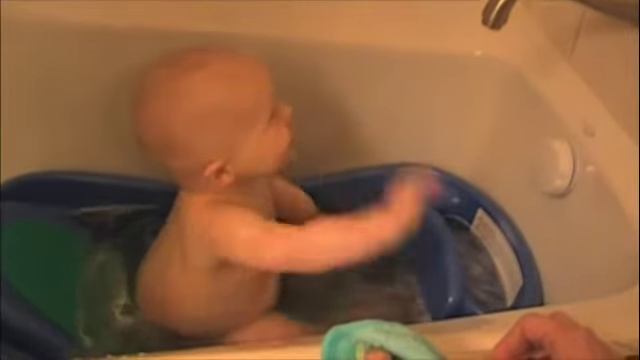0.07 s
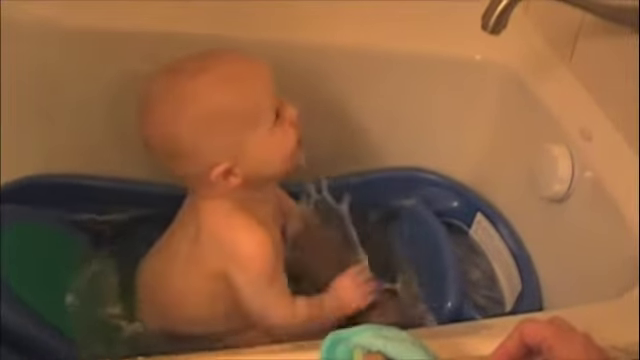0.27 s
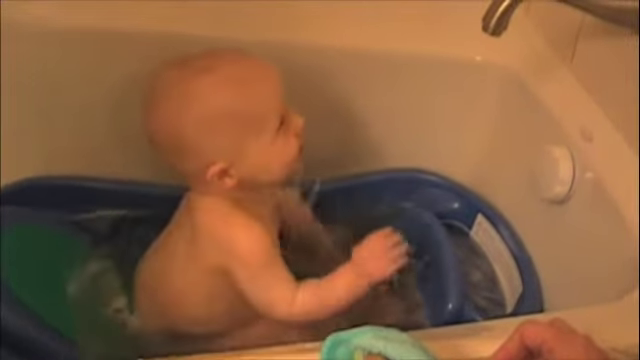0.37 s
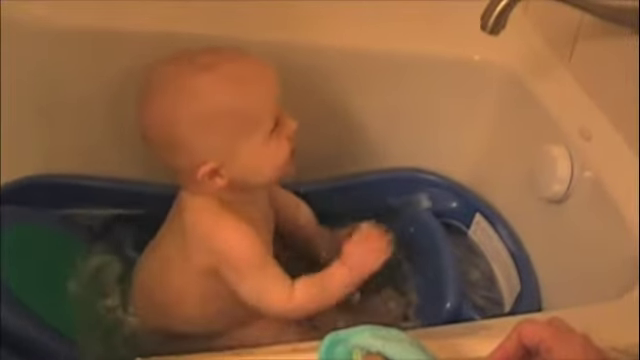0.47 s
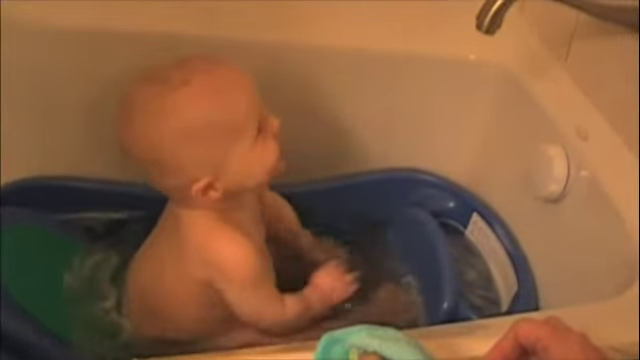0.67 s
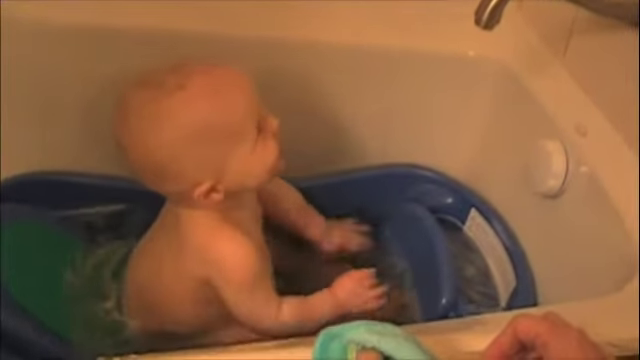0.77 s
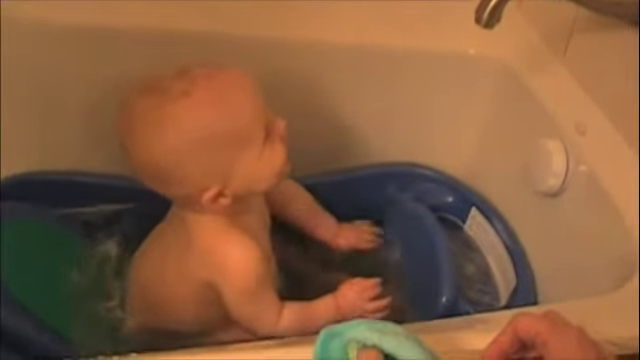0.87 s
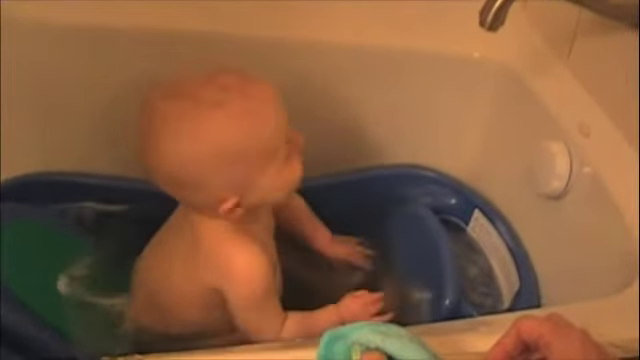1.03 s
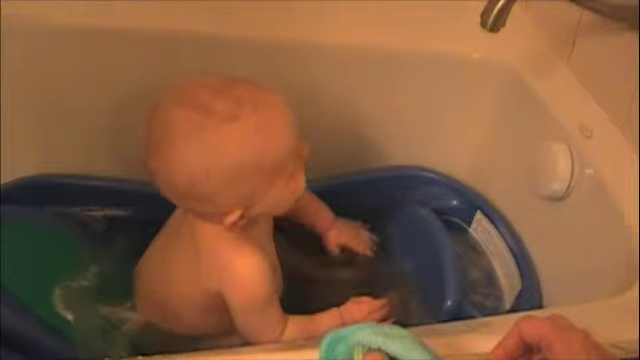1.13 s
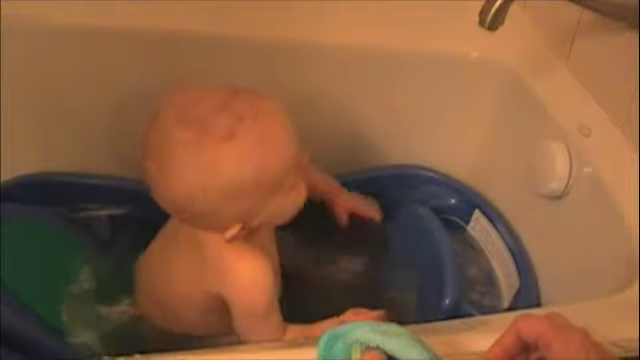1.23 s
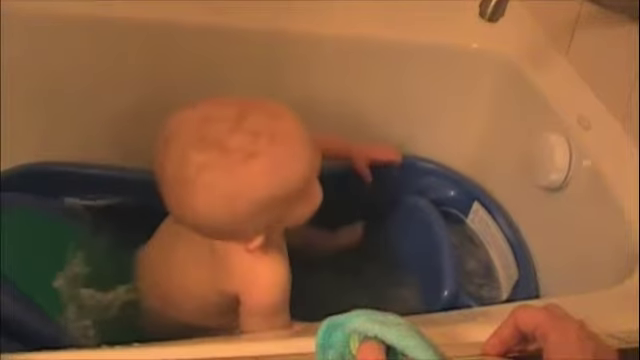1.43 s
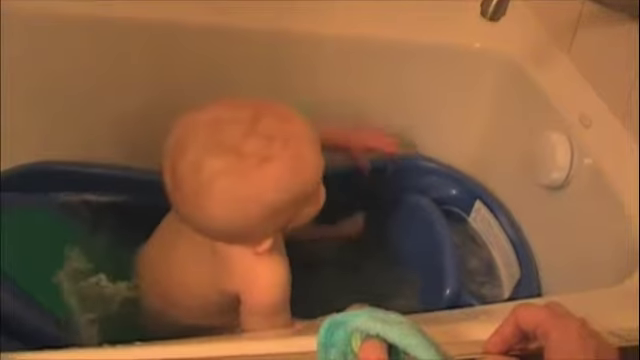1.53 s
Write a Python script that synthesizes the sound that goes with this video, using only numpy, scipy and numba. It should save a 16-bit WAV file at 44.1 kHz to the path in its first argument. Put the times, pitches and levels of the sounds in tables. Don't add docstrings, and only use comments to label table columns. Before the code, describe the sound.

A small hand slaps bath water twice, throwing bright, crackling spray; bubbles gurgle and drops fall back, then fade to light drips. A plastic seat knocks dully. Close, hard bathroom echo, thin camera microphone.

```python
import sys
import numpy as np
from scipy import signal
from scipy.fft import rfft, irfft
from scipy.io import wavfile
from scipy.ndimage import map_coordinates
from numba import njit

SR = 44100
rng = np.random.default_rng(int(sys.argv[2]) if len(sys.argv) > 2 else 0)


def attenuation_scalar(level_db):
    decades = np.asarray(level_db, float) / 20
    return 10 ** decades


def generate_wav(signal):
    frames = np.transpose(np.atleast_2d(signal))
    scaled = np.clip(frames, -1, 1) * 32767
    pcm = np.round(scaled).astype(np.int16)
    wavfile.write(sys.argv[1], SR, pcm)


N = 70560

# frequency in Hz, level in dB per Hz.
HUSH_SPECTRUM = [(15, -47), (25, -5), (87, 10), (1440, -5), (2160, -58), (3820, -22), (7510, -14),
                 (14400, -29), (16000, -45)]
# time in seconds, level in dB.
SEAT_RUB = [(0.0, -45), (0.16, -46.5), (0.236, -43), (0.444, -58), (0.48, -81), (0.531, -37), (0.65, -57),
            (0.988, -61), (1.6, -57.5)]
# frequency in Hz, time to fall 60 dB in seconds.
ROOM_DECAY = [(200, 0.54), (1500, 0.42), (5000, 0.54), (12000, 0.31)]
# frequency in Hz, side minus mid in dB.
SIDE_SPECTRUM = [(60, -10), (250, -14), (1000, -16.5), (3000, -18), (6300, -23), (8300, -6), (10800, -10),
                 (15000, -7)]
# frequency in Hz, left minus right in dB.
LEFT_RIGHT = [(100, -3.7), (300, -3.5), (1000, -1.2), (8000, 0), (13000, 1.2)]
# start in seconds, level in dB, pitch in Hz, length in cycles.
SEAT_KNOCKS = [
    (0.028, -25, 260, 3),
    (0.202, -19, 244, 1.4),
    (0.239, -25, 202, 2.1),
    (0.515, -20.5, 830, 11),
    (0.525, -21.5, 402, 4.8),
    (0.54, -24.5, 596, 6),
    (1.225, -33, 255, 2.9),
    (1.289, -40.5, 640, 5),
    (1.352, -36, 296, 3),
    (1.525, -37, 304, 2.1),
]
# time in seconds, level in dB, brightness in dB per octave.
WATER_CHURN = [(0.0, -58.5, -9), (0.11, -54.5, -6.5), (0.208, -53, -8.5), (0.237, -30, -1),
               (0.286, -33, -4.5), (0.392, -37.5, -0.5), (0.686, -30.5, 0), (0.836, -41.5, -2),
               (1.078, -58.5, 5.5), (1.32, -61.5, -7), (1.6, -54.5, -5)]
# frequency in Hz, level in dB.
SPRAY_SPECTRUM = [(250, -8.5), (500, -7), (700, -2), (1150, -1.5), (1500, 4), (4500, -2), (8000, -8),
                  (15000, -42.5)]
# peak in seconds, level in dB, rise in seconds, fall in seconds,
# brightness in dB per octave.
SPRAY_GUSHES = [
    (0.218, -35, 0.00044, 0.013, 15),
    (0.227, -21.5, 0.0016, 0.0046, -1),
    (.43, -43, 0.0024, 0.016, 10),
    (0.506, -19.5, 0.0018, 0.022, -3),
    (0.575, -16.5, 0.0053, 0.0028, 6),
    (0.723, -39, 0.0037, 0.0043, 2.5),
    (1.233, -53, 0.036, 0.027, -7.5),
    (1.528, -32, 0.0028, 0.0085, -1.5),
]
# start in seconds, level in dB, pitch in Hz, length in cycles.
SPRAY_CRACKS = [
    (.2275, -17, 6900, 9),
    (.5712, -15, 7700, 14),
    (.5738, -15, 6700, 12),
    (.5755, -16, 8200, 12),
    (.5776, -7.5, 7200, 10),
    (.5797, -18, 7700, 14),
    (.7262, -20, 6700, 14),
    (1.0205, -30, 8000, 6),
    (1.022, -33, 10500, 8),
]
# start in seconds, level in dB, pitch in Hz, length in cycles.
DROP_TICKS = [(0.0542, -32, 8700, 3.3), (0.0903, -14.5, 6960, 1.55), (0.1765, -39, 7700, 5),
              (0.189, -36, 9500, 7.2), (0.203, -37, 6900, 5.5), (0.2162, -11, 8550, 4.3),
              (0.2265, -22, 7600, 5.2), (0.4309, -16, 7050, 1.9), (0.5045, -14.5, 7500, 6.5),
              (0.7194, -19.5, 7600, 5.3), (0.7253, -17.5, 6780, 4.5), (0.8873, -31, 7400, 5.3),
              (0.945, -45, 9000, 2.8), (0.9608, -27, 8060, 4.1), (1.2797, -33, 8500, 5),
              (1.295, -29, 7130, 11), (1.3653, -37.5, 7800, 4.8), (1.3748, -34, 8200, 4.6),
              (1.308, -38, 7530, 3.7), (1.33, -40, 7000, 4), (1.395, -37, 11600, 3.7),
              (1.407, -36, 6860, 3.4), (1.4155, -22, 8400, 2.8), (1.428, -32, 8500, 7.6),
              (1.4748, -23.5, 7840, 3), (1.482, -26, 7600, 4), (1.494, -23.5, 7090, 9.3),
              (1.508, -35, 7640, 5.6), (1.5275, -29.5, 6630, 8.6), (1.5493, -30, 6750, 7.8)]
# start in seconds, level in dB, pitch in Hz, length in cycles.
BUBBLES = [(0.2265, -8, 1862, 7.4), (0.2462, -10, 3220, 7.4), (0.2478, -7, 3670, 4.9),
           (0.2495, -9.5, 3510, 8.8), (0.289, -24.5, 682, 21.7), (0.318, -18, 1790, 6.4),
           (0.457, -28, 3030, 30), (0.467, -30.5, 768, 23.6), (0.493, -30, 2120, 10),
           (0.512, -9.5, 1546, 7.8), (0.526, -22.5, 1714, 12), (0.542, -17, 1350, 11),
           (0.578, -13, 2280, 8), (0.597, -13, 2640, 7.2), (0.694, -17, 1813, 22),
           (0.7115, -16.5, 1208, 22), (0.734, -17, 1814, 9.3), (0.766, -24.5, 1224, 22.5),
           (0.823, -23, 1850, 8.1), (0.905, -29, 2840, 17.4), (0.931, -36.5, 4070, 42),
           (1.041, -20.5, 2790, 5.3), (1.376, -29, 3050, 16), (1.4205, -27.5, 2880, 9.7),
           (1.442, -27, 3230, 6.6), (1.475, -26, 1910, 7.7), (1.494, -23, 4300, 8.8),
           (1.5275, -19.5, 1754, 6.2),
           (.2, -32.5, 186.5, 19), (0.226, -10.5, 9850, 12), (.254, -31, 1862, 71),
                   (.3, -24.5, 1837, 33), (0.341, -32.5, 1840, 24), (.372, -32.5, 1795, 43),
                   (0.26, -31, 3260, 17), (0.315, -23, 2880, 19), (.348, -27.5, 2930, 28),
                   (0.498, -27, 3430, 23), (0.531, -33, 2460, 19), (.552, -12.5, 1376, 5),
                   (0.598, -21, 4150, 23), (0.621, -27.5, 6770, 14), (0.659, -27, 6840, 27),
                   (0.689, -22, 5900, 12), (1.067, -43, 2830, 41), (1.084, -42.5, 2893, 37),
                   (1.11, -51, 2890, 99), (1.43, -44, 3344, 54), (1.0405, -39, 3300, 2.6),
                   (1.5285, -26.5, 3140, 7.1), (1.575, -44, 1900, 18), (0.277, -14, 1415, 6.6),
                   (0.578, -16, 3960, 8.2), (.689, -23, 2170, 12), (.723, -17.5, 1265, 11.3),
                   (.748, -34, 1130, 20), (.770, -8.5, 1803, 5.1), (.787, -27, 1210, 24),
                   (.81, -30, 1202, 22), (0.839, -39, 1137, 29), (1.022, -31, 12400, 2.7),
                   (1.041, -37.5, 1990, 27), (1.049, -43, 2944, 70), (1.13, -46, 4190, 36),
                   (1.2, -47.5, 4500, 25), (1.226, -39.5, 800, 9), (1.242, -43, 1880, 7.9),
                   (1.309, -43.5, 2690, 19), (1.381, -36.5, 3660, 27), (1.394, -44, 3670, 18),
                   (1.411, -42, 5200, 29), (1.476, -37, 13100, 4), (1.485, -38, 1878, 46),
                   (1.494, -38, 13600, 4), (1.53, -27.5, 1585, 34), (1.545, -36, 1545, 54)]

HUSH_DB, RUB_DB, KNOCK_DB, SPRAY_DB, TICK_DB = -56, -6, -2.5, -7, 4.5
RUB_HZ, RUB_WIDTH_HZ = 230, 65
WALLS_DB, WALLS_GAP_S = -2, 0.011
TUB_DB, TUB_T60_S = -5, .025
BUBBLE_ROOM_DB, TICK_ROOM_DB, CRACK_ROOM_DB = -2, -5, -15
MIC_PEAK_HZ, MIC_WIDTH_HZ, MIC_PEAK_DB, MIC_TOP_DB_OCT, LOW_CUT_HZ = 7200, 900, 8, 2.5, 204
SIDE_DB = 5
GRAIN_SCATTER_DB, GRAIN_TOP_DB, GRAIN_CYCLES = 1.5, 9, 4.6
PATCHY_DB, PATCH_S, PATCH_OCT = 7, .035, .6
SPLAT_S, SPLAT_OCT, SPLAT_DB, SPLAT_STRETCH = .0012, 0.17, -6.5, 1.48
SWELL_CYCLES, TICK_SWELL_CYCLES, BUBBLE_SWELL_CYCLES = 1.3, 1.6, 2.3


def read(table, hz):
    table = np.array(table, float)
    return np.interp(np.log(np.maximum(hz, 1)), np.log(table[:, 0]), table[:, 1])


def colour(x, db_of_hz):
    n = x.shape[-1]
    hz = np.arange(n // 2 + 1) * SR / n
    return irfft(rfft(x) * attenuation_scalar(db_of_hz(hz)), n)


def rms(x):
    return np.sqrt(np.mean(x ** 2))


@njit
def ring(n, start, size, hz, cycles, glide, swell, sr):
    out = np.zeros(n)
    for k in range(len(start)):
        span = cycles[k] * sr / hz[k]
        phase = 0.
        for i in range(int(2.5 * span)):
            j = int(start[k] * sr) + i
            if j >= n:
                break
            phase += 2 * np.pi * hz[k] * (1 + glide[k] * i / span) / sr
            fade = np.exp(-2.3 * i / span)
            onset = np.sin(min(phase / (4 * swell), np.pi / 2)) ** 2
            out[j] += size[k] * fade * onset * np.sin(phase)
    return out


def played(table, gain_db, glide, swell):
    t, db, hz, cycles = np.array(table, float).T
    cycles = np.clip(cycles, 1.5, 60)
    return ring(N, np.maximum(t, 0), attenuation_scalar(db + gain_db), hz, cycles, glide + 0 * t, swell, float(SR))


def hush():
    noise = colour(rng.standard_normal((2, N)), lambda f: read(HUSH_SPECTRUM, f))
    return noise * attenuation_scalar(HUSH_DB) / rms(noise[0])


def room():
    t = np.arange(SR) / SR
    noise = rng.standard_normal((2, SR))
    walls = 0
    for hz in 90 * 2. ** np.arange(8):
        band = colour(noise, lambda f: 20 * np.log10(np.maximum(1 - abs(np.log2((f + 1) / hz)), 1e-6)))
        t60 = max(read(ROOM_DECAY, hz), .05)
        walls = walls + band * attenuation_scalar(-60 * t / t60)
    walls = walls * np.clip(t / WALLS_GAP_S, 0, 1) ** 2
    tub = rng.standard_normal((2, SR)) * attenuation_scalar(-60 * t / TUB_T60_S) * (t > .0012)
    walls = walls * attenuation_scalar(WALLS_DB) / np.sqrt(np.sum(walls[0] ** 2))
    tub = tub * attenuation_scalar(TUB_DB) / np.sqrt(np.sum(tub[0] ** 2))
    return walls + tub


def capsule(f):
    peak = MIC_PEAK_DB / (1 + ((f - MIC_PEAK_HZ) / MIC_WIDTH_HZ) ** 2)
    top = MIC_TOP_DB_OCT * np.log2(np.maximum(f / 9000, 1))
    low_cut = 10 * np.log10(1 + (LOW_CUT_HZ / (f + 1)) ** 4)
    return peak + top - low_cut


def stereo(mid, side):
    side = colour(side, lambda f: read(SIDE_SPECTRUM, f) + SIDE_DB)
    left = colour(mid + side, lambda f: read(LEFT_RIGHT, f) / 2)
    right = colour(mid - side, lambda f: -read(LEFT_RIGHT, f) / 2)
    return np.array([left, right])


def rub():
    at, db = np.array(SEAT_RUB, float).T
    noise = colour(rng.standard_normal(N), lambda f: -20 * np.log10(1 + ((f - RUB_HZ) / RUB_WIDTH_HZ) ** 2))
    return noise / rms(noise) * attenuation_scalar(np.interp(np.arange(N) / SR, at, db) + RUB_DB)


def knocks():
    return played(SEAT_KNOCKS, KNOCK_DB, 0.062, SWELL_CYCLES)


def spray(count):
    u = rng.random((count, 5)).T
    t = u[0] * N / SR
    hz = 250 * 62 ** u[1]
    octave = np.log2(hz / 3000)
    scatter = np.minimum(-GRAIN_SCATTER_DB * np.log(u[2] + 1e-4), GRAIN_TOP_DB)
    own = attenuation_scalar(read(SPRAY_SPECTRUM, hz) + 20 * np.log10(hz / 2000) + scatter)
    at, db, tilt = np.array(WATER_CHURN, float).T
    shape = attenuation_scalar(np.interp(t, at, db) + np.interp(t, at, tilt) * octave)
    patches = u[3, :1200].reshape(12, 100) - .5
    where = [np.log2(hz / 250) / PATCH_OCT, t / PATCH_S]
    shape = shape * attenuation_scalar(2 * PATCHY_DB * map_coordinates(patches, where, order=1))
    for peak, db, rise, fall, tilt in SPRAY_GUSHES:
        burst = np.exp(-abs(t - peak) / np.where(t < peak, rise, fall))
        shape = shape + attenuation_scalar(db + tilt * octave) * burst
    cycles = np.clip(GRAIN_CYCLES * (0.15 + 1.52 * u[3]), 1.5, 40)
    args = (hz, cycles, 0.43 * u[4], SWELL_CYCLES, float(SR))
    steady = ring(N, t, own, *args)
    return ring(N, t, own * shape * attenuation_scalar(SPRAY_DB), *args) / rms(steady)


def cracks():
    return played(SPRAY_CRACKS, 0, 0., BUBBLE_SWELL_CYCLES)


def ticks(count):
    u = rng.standard_normal((len(DROP_TICKS), count, 2))
    t, db, hz, cycles = np.array(DROP_TICKS, float).T[:, :, None]
    order = np.arange(count)
    late = SPLAT_S * order * (0.56 + 0.17 * abs(u[..., 0]))
    level = db + SPLAT_DB - 4.6 * order
    pitch = hz * 2 ** (SPLAT_OCT * u[..., 1])
    rows = [t + late, level + 0 * late, pitch, cycles * SPLAT_STRETCH + 0 * late]
    return played(np.reshape(rows, (4, -1)).T, TICK_DB, 0., TICK_SWELL_CYCLES)


def bubbles():
    return played(BUBBLES, 0, .04, BUBBLE_SWELL_CYCLES)


def scene():
    ringing, ticking, cracking = bubbles(), ticks(count=4), cracks()
    body = knocks() + spray(count=16000)
    near = colour(ringing + ticking + cracking + body, capsule)
    sent = ringing * attenuation_scalar(BUBBLE_ROOM_DB) + ticking * attenuation_scalar(TICK_ROOM_DB) + cracking * attenuation_scalar(CRACK_ROOM_DB) + body
    wet = signal.fftconvolve(colour(sent, capsule)[None], room(), axes=1)[:, :N]
    around = wet + hush()
    return stereo(near + around[0] + rub(), around[1])


def top_cut(x):
    return signal.sosfilt(signal.butter(12, 16510, fs=SR, output="sos"), x)


def record(dry):
    low_pass = signal.ellip(8, .2, 70, 15600, fs=SR, output="sos")
    mix = signal.sosfilt(low_pass, dry)
    return top_cut(mix)


dry = scene()
out = record(dry)
generate_wav(out)
```